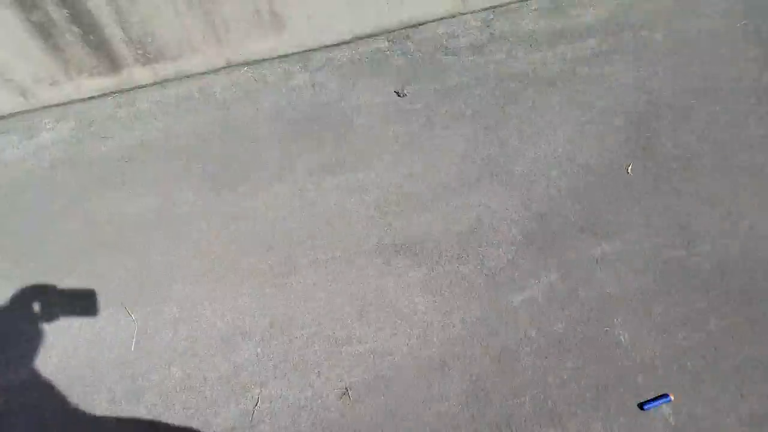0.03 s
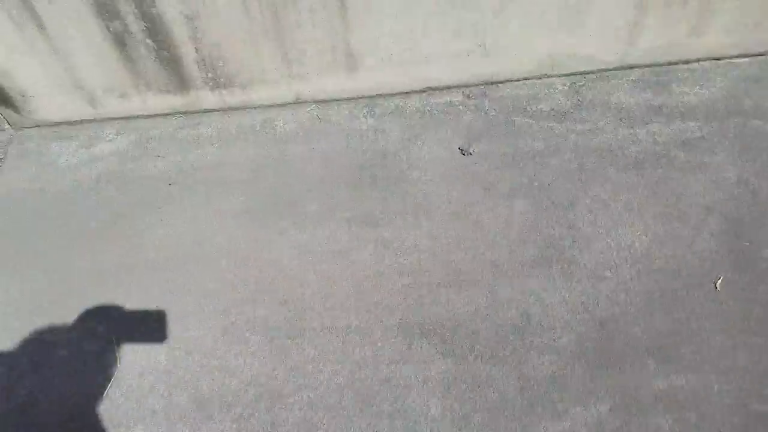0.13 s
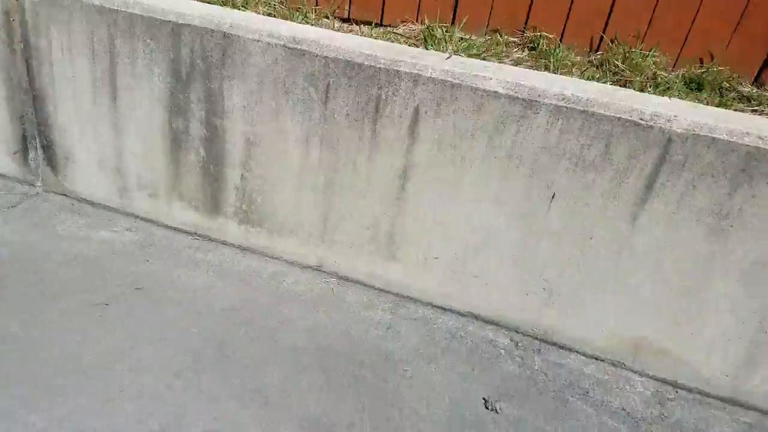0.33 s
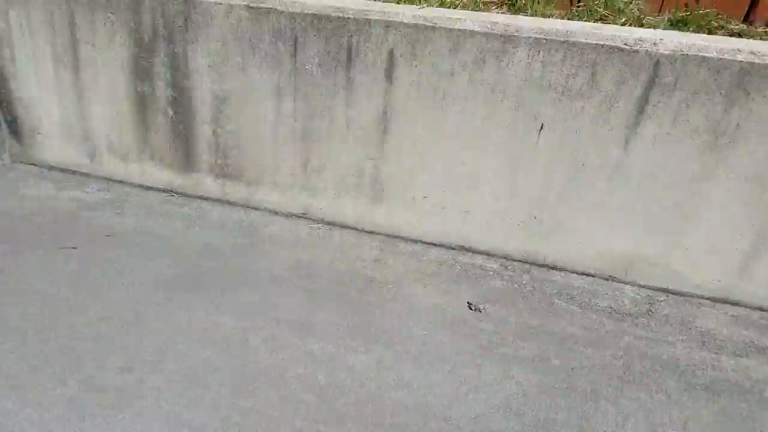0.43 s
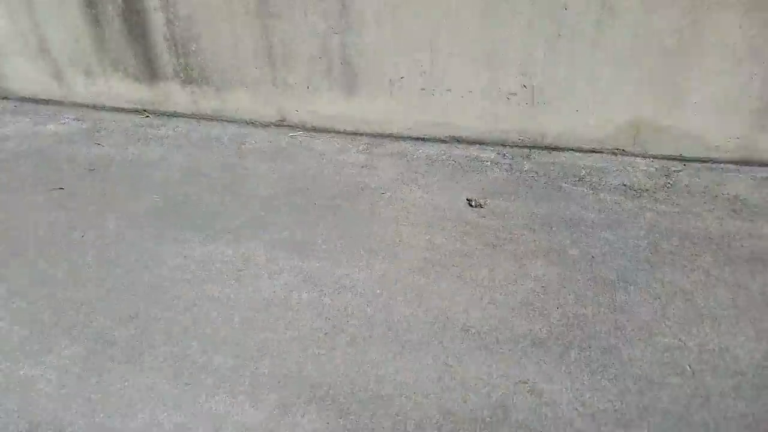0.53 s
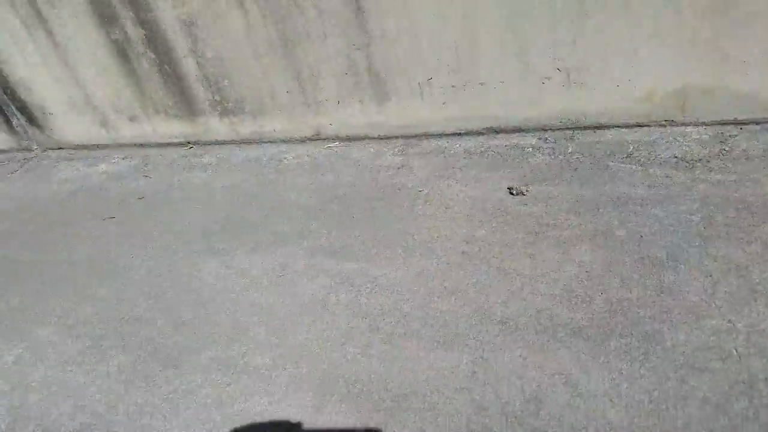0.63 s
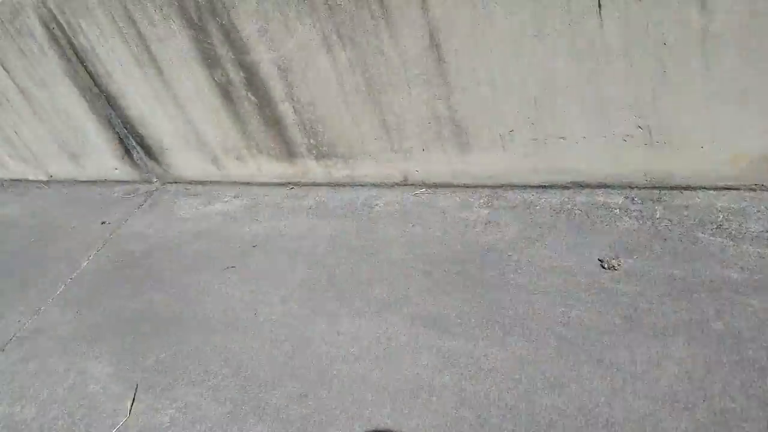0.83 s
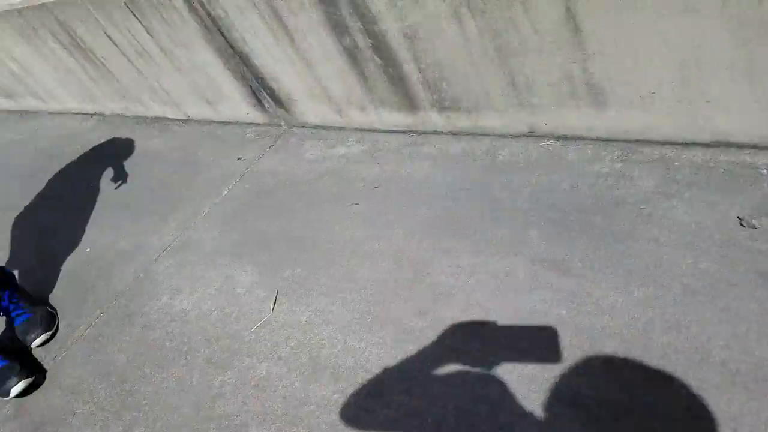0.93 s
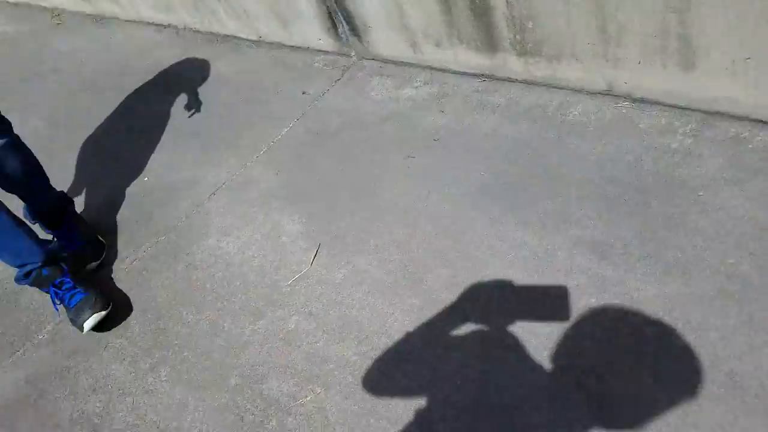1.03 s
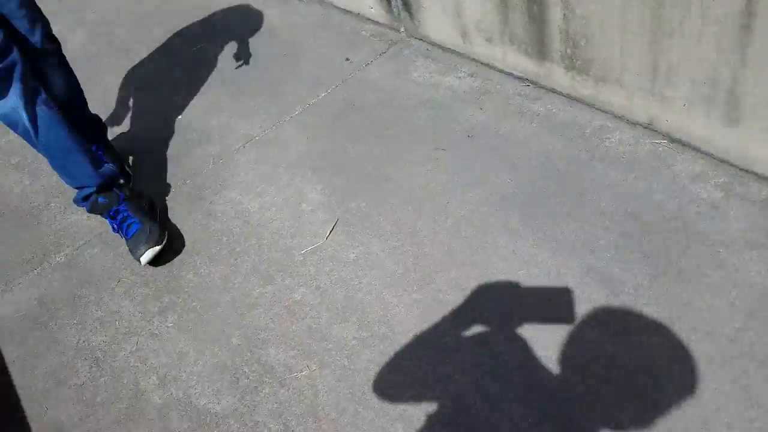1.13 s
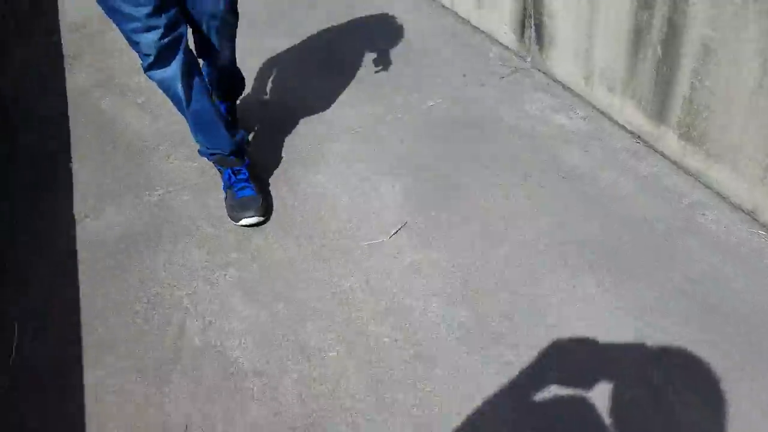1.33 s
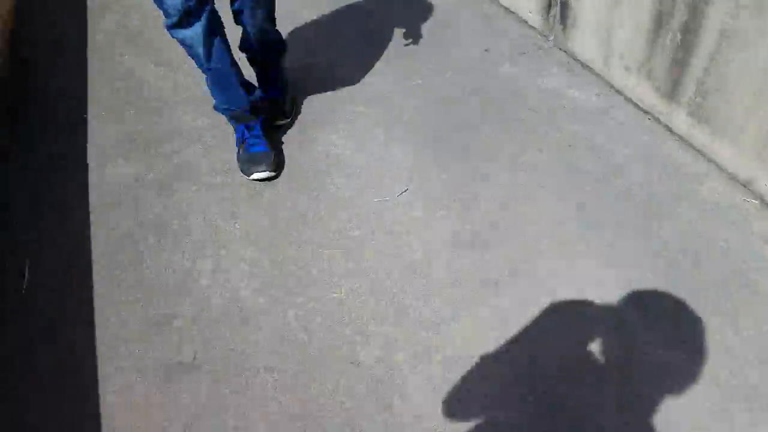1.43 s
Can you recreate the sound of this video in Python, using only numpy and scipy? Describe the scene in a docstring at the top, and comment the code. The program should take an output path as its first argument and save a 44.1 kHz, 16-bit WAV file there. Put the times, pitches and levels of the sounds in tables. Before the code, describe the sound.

In a quiet outdoor yard, a dart slaps onto concrete, rebounding with a dull thud. Tiny taps and handling rubs sound close to the hand-held microphone, a breeze nudges it, and shoes step and scuff softly.

```python
"""A concrete yard beside a low wall. A dart knocks on the ground: a hard slap that rebounds,
a duller thud just after it and a short gritty skid. Faint ticks, shoe scuffs and soft steps
follow. Fingers rustle on a hand-held camera, a breeze nudges its microphone ports, and a
quiet outdoor hush lies under everything."""
import sys
import numpy as np
from scipy import signal
from scipy.fft import rfft, irfft, next_fast_len
from scipy.io import wavfile
from scipy.ndimage import map_coordinates

SR = 44100
rng = np.random.default_rng(int(sys.argv[2]) if len(sys.argv) > 2 else 0)


def generate_wav(sig):
    """Save sig (samples, or channels by samples) to the path in sys.argv[1] as 16-bit PCM at SR."""
    pcm = np.round(np.clip(np.atleast_2d(sig).T, -1, 1) * 32767).astype(np.int16)
    wavfile.write(sys.argv[1], SR, pcm)


N = 66150

# fine friction hiss of grit and fingers: freq_hz, level_db
HISS_SPECTRUM = [(1000, -26), (4000, -7), (7500, -9), (10500, -1.5), (15500, -1.5)]
# left-right likeness of the dart's noise: freq_hz, correlation
DART_LIKENESS = [(500, 0.95), (2500, 0.5), (10000, 0.16)]


def dart():
    """The dart slaps, rebounds, thuds, skids over grit and rings briefly."""
    slap_hits = [(.2443, -7.5), (.2533, -16)]  # start_s, level_db
    slap_modes = [(395, -4.5, 2.6), (630, -1, 3.26), (910, -3, 6.2), (1746, -15, 16), (2800, -2.5, 11.2),
                  (4610, -15, 20)]  # pitch_hz, level_db, life_cycles
    thud_modes = [(401, -2, 6.23), (870, -15, 9.4), (1340, -12.5, 16), (1738, -9, 17.2), (2220, -3, 3.8),
                  (2540, -13.5, 16)]  # pitch_hz, level_db, life_cycles
    slap_ring = [(782, -24, 0.039), (2328, -26, 0.035)]  # pitch_hz, level_db, t60_s
    thud_ring = [(205.4, -34, .11), (254.8, -27.5, 0.13), (355.5, -24.5, 0.12), (396, -26.5, .15),
                 (468, -26.5, 0.13), (519, -32, .14), (810, -29.5, .075), (1200, -36, 0.14),
                 (1612, -30, 0.04), (2117, -32, .08)]  # pitch_hz, level_db, t60_s
    skids = [(.245, -27, 0.0038, 0.0849, -48), (.269, -22, 0.0064, 0.0984, -34.5)]  # start_s, level_db, rise_s, t60_s, grit_db
    skid_spectrum = [(90, -28), (220, -1), (400, 0.5), (620, -3.5), (820, -5), (1100, -4), (1700, -5),
                     (2700, -10.5), (4000, -16.5), (6500, -29), (16000, -32)]  # freq_hz, level_db
    slap_s, thud_s, thud_db = slap_hits[0][0], 0.2678, -6
    slaps = sum(amp(db) * blow(s, slap_modes, cut_hz=260, crack_db=-20, hollow=True)
                for s, db in slap_hits)
    thud = amp(thud_db) * blow(thud_s, thud_modes, cut_hz=99, crack_db=-15)
    skid = 0
    for start_s, level_db, rise_s, t60_s, grit_db in skids:
        slide = amp(level_db) * noise(skid_spectrum, DART_LIKENESS)
        grit = amp(grit_db) * noise(HISS_SPECTRUM, DART_LIKENESS)
        skid += (slide + grit) * swell(start_s, rise_s, t60_s)
    ring = ringing(slap_s, slap_ring) + ringing(thud_s, thud_ring)
    return lag_left(slaps + thud + skid + ring, lag_s=0.00014)


def blow(start_s, modes, cut_hz, crack_db, hollow=False):
    """Short resonances and a noise crack; alternating signs leave hollows between the modes."""
    crack_spectrum = [(500, -20), (1800, -0.5), (2700, 3), (4200, -1), (6500, -17.5), (10000, -9),
                      (16000, -26)]  # freq_hz, level_db
    body = sum((-1) ** (k * hollow) * amp(db) * push(start_s, hz, cycles)
               for k, (hz, db, cycles) in enumerate(modes))
    crack = noise(crack_spectrum, DART_LIKENESS) * swell(start_s, rise_s=0.00038, t60_s=0.017)
    return low_cut(body, cut_hz) + amp(crack_db) * crack


def ringing(start_s, modes, rise_s=0.0096):
    """Modes swell after a blow and die away."""
    t = since(start_s)
    return sum(amp(db) * swell(start_s, rise_s, t60_s) * np.sin(2 * np.pi * (hz * t + rng.random()))
               for hz, db, t60_s in modes)


def feet():
    """Soft soles land with a low push and a little grit, and scuff the concrete."""
    steps = [(0.8627, -43, 467, 2.5, -44.5), (.907, -43, 512, 15, -49), (1.1232, -42, 626, 3.1, -43),
             (1.203, -43.5, 545.2, 3.8, -42), (1.2782, -28, 423, 7.3, -33.5),
             (1.3184, -29.5, 494, 3.6, -42)]  # start_s, body_db, pitch_hz, life_cycles, grit_db
    grit_spectrum = [(80, -23.5), (250, 2), (500, 4.5), (1000, -8.5), (1900, -3), (3200, -20),
                     (7000, -36.5), (14000, -23)]  # freq_hz, level_db
    scuffs = [(.001, -39, 0.029, 0.03), (.9, -54, 0.024, 0.34), (1.121, -45, .004, 0.09),
              (1.238, -46, 0.013, 0.32)]  # start_s, level_db, rise_s, t60_s
    scuff_spectrum = [(150, -20), (600, -9), (730, 5), (860, -8), (1030, 4.5), (1200, -5.5), (2200, -8),
                      (3500, -24), (7000, -35.5), (14000, -25)]  # freq_hz, level_db
    soles = sum(amp(db) * push(s, hz, cycles) for s, db, hz, cycles, _ in steps)
    grit_envelope = sum(amp(db) * swell(s, rise_s=0.0018, t60_s=0.07) for s, *_, db in steps)
    grit = noise(grit_spectrum) * grit_envelope
    scuffing = noise(scuff_spectrum) * swells(scuffs)
    return lag_left(low_cut(soles, hz=130) + grit + scuffing, lag_s=0.00018)


def ticks():
    """Tiny dry taps near the camera, each with a brief fine crackle."""
    taps = [(.475, -26, -49, -0.5), (.48, -31, -55, 2), (0.5175, -34.5, -44.5, 5), (0.5195, -39, -60, 2),
            (.733, -49, -51.5, 3), (0.826, -43.5, -53.5, 0), (0.9482, -51, -45, 1)]  # start_s, peak_db, crackle_db, pan_db
    tap_spectrum = [(300, -38), (1400, -10.5), (2800, -0.5), (5000, -16), (6700, -31), (16000, -22)]  # freq_hz, level_db
    crackle_spectrum = [(4000, -16), (9500, -1), (13500, 0), (15500, -7)]  # freq_hz, level_db
    crackle_noise = noise(crackle_spectrum)
    mix = 0
    for start_s, peak_db, crackle_db, pan_db in taps:
        tap = amp(peak_db) * click(start_s, tap_spectrum)
        crackle = amp(crackle_db) * crackle_noise * swell(start_s, rise_s=0.00027, t60_s=0.012)
        mix += (tap + crackle) * pan(pan_db)
    return mix


def finger_scrape(start_s=0.527, length_s=0.034, scatter_s=0.00121, slips=5, level_db=-38):
    """A finger sticks and slips unevenly; each slip rings the camera's casing."""
    slips_s = start_s + np.linspace(0, length_s, slips) + scatter_s * rng.standard_normal(slips)
    return amp(level_db) * sum(push(s, hz=2110, cycles=15.4) for s in slips_s)


def finger_rubs(grain_db=2.5):
    """Fingers rub the camera: a grainy rasp with a fine hiss."""
    rubs = [(.509, -46.5, -64, .009, .03), (.524, -45, -51.5, 0.0054, 0.32),
            (.532, -43, -44.5, .026, 0.1137), (0.582, -54, -60.5, 0.031, 0.43),
            (.644, -53, -60.5, 0.03, 0.43), (0.74, -52, -52.5, 0.013, 0.24),
            (1.1883, -45.5, -42.5, .002, 0.12), (1.2, -52, -61, 0.0086, 0.52)]  # start_s, rasp_db, hiss_db, rise_s, t60_s
    rasp_spectrum = [(150, -11.5), (500, -0.5), (1400, -4.5), (2050, 1), (3200, -6), (4500, -24.5),
                     (16000, -41)]  # freq_hz, level_db
    rasp = noise(rasp_spectrum) * swells((s, db, rise_s, t60_s) for s, db, _, rise_s, t60_s in rubs)
    hiss = noise(HISS_SPECTRUM) * swells((s, db, rise_s, t60_s) for s, _, db, rise_s, t60_s in rubs)
    grain = unit(amp(grain_db * wobble(rate_hz=400)))
    return (rasp + hiss) * grain * pan(-0.5)


def breeze():
    """Low puffs of air on the ports, stronger on the left."""
    puffs = [(0.139, -48, 0.026, 0.5), (.298, -45.5, 0.084, 0.47), (.404, -42, 0.021, 0.16),
             (.535, -57, 0.024, 0.73), (.738, -54, 0.037, 0.7), (.85, -57, 0.058, .5)]  # start_s, level_db, rise_s, t60_s
    puff_spectrum = [(20, -30), (60, 4.5), (130, 6), (250, -1.5), (450, -3.5), (900, -19), (3000, -35.5)]  # freq_hz, level_db
    return noise(puff_spectrum) * swells(puffs) * pan(3.5)


def yard_echo(x, level_db=-16.5, delay_s=0.012):
    """Wall and fence return a faint diffuse tail."""
    decay_times = [(100, 0.51), (400, 0.54), (1000, 0.3), (2500, 0.54), (14000, 0.79)]  # freq_hz, t60_s
    hz, t, bands = signal.stft(rng.standard_normal((2, SR // 2)), SR, nperseg=256)
    decay = np.exp(-np.log(1000) * t / along(decay_times, hz)[:, None])
    tail = signal.istft(bands * decay, SR)[1]
    tail = np.pad(tail / np.linalg.norm(tail[0]), ((0, 0), (round(delay_s * SR), 0)))
    return amp(level_db) * signal.fftconvolve(x, tail, axes=1)[:, :N]


def hush(waver_db=1.33):
    """Quiet outdoor background; its level drifts and wavers."""
    levels = [(0, -50), (.1, -55.5), (.23, -53.5), (.45, -48), (.62, -57.5), (.84, -56.5), (0.998, -49),
              (1.25, -49.5), (1.5, -51)]  # time_s, level_db
    spectrum = [(25, -30), (48, -15), (161, -10.5), (451, -6.5), (754, -4), (1330, -10.5), (1940, -11.5),
                (2690, -18.5), (6740, -35), (16000, -26)]  # freq_hz, level_db
    likeness = [(60, 0.59), (240, 0.98), (950, 0.051), (3770, -0.16), (15000, 0.16)]  # freq_hz, correlation
    balance = [(80, -3), (400, 0), (950, -2), (2400, -0.8)]  # freq_hz, pan_db
    level_db = np.interp(since(0), *np.transpose(levels)) + waver_db * wobble(rate_hz=14.17)
    return pan_bands(noise(spectrum, likeness), balance) * amp(level_db)


def push(start_s, hz, cycles):
    """Heavily damped swing of peak 1, gone after the given cycles."""
    turns = since(start_s) * hz
    age = turns * 3 * np.pi / cycles
    swing = -np.sin(2 * np.pi * turns) * age * np.exp(-age)
    return swing / abs(swing).max()


def click(start_s, spectrum, size=2048):
    """Minimum-phase click of peak 1."""
    gain = amp(along(spectrum, np.fft.rfftfreq(size, 1 / SR)))
    cepstrum = irfft(np.log(gain))
    cepstrum[1:size // 2] *= 2
    cepstrum[size // 2 + 1:] = 0
    pulse = irfft(np.exp(rfft(cepstrum)))
    return np.pad(pulse / abs(pulse).max(), (round(start_s * SR), N))[:N]


def noise(spectrum, likeness=None):
    """Coloured stereo noise of rms 1 with a given left-right likeness."""
    near_likeness = [(60, 0), (350, 0.75), (2000, 0.03), (12000, 0)]  # default for near sources: freq_hz, correlation

    def mid_side_gain(hz):
        angle = np.arccos(np.clip(along(likeness or near_likeness, hz), -1, 1)) / 2
        return amp(along(spectrum, hz)) * [np.cos(angle), np.sin(angle)]

    mid, side = filtered(rng.standard_normal((2, N)), mid_side_gain)
    return unit(np.array([mid + side, mid - side]))


def swell(start_s, rise_s, t60_s):
    """Smooth rise, exponential fall."""
    rise = np.sin(np.pi / 2 * np.minimum(since(start_s) / rise_s, 1)) ** 2
    return rise * np.exp(-np.log(1000) * since(start_s + rise_s) / t60_s)


def swells(events):
    """Summed envelope of several swells."""
    return sum(amp(db) * swell(s, rise_s, t60_s) for s, db, rise_s, t60_s in events)


def wobble(rate_hz):
    """Smooth random curve, rate_hz knots a second."""
    knots = rng.standard_normal(int(N * rate_hz / SR) + 4)
    return map_coordinates(knots, [np.arange(N) * rate_hz / SR])


def filtered(x, response):
    """Apply a complex frequency response."""
    size = next_fast_len(N + SR // 2)
    return irfft(rfft(x, size) * response(np.fft.rfftfreq(size, 1 / SR)), size)[..., :N]


def low_cut(x, hz):
    """Second-order high-pass."""
    return signal.sosfilt(signal.butter(2, hz, "high", fs=SR, output="sos"), x)


def lag_left(x, lag_s):
    """Sound reaches the left port lag_s after the right."""
    return filtered(x, lambda hz: np.exp(-1j * np.pi * hz * lag_s * np.array([[1], [-1]])))


def pan(pan_db):
    """Stereo gains: left up, right down by pan_db."""
    return amp(pan_db * np.array([[1], [-1]]))


def pan_bands(x, balance):
    """Pan by frequency."""
    return filtered(x, lambda hz: pan(along(balance, hz)))


def along(points, hz):
    """Interpolate (freq_hz, value) points on a log axis."""
    freq_hz, values = np.transpose(points)
    return np.interp(np.log(hz + 1), np.log(freq_hz + 1), values)


def since(start_s):
    """Seconds since start_s, zero before."""
    return np.maximum(np.arange(N) / SR - start_s, 0)


def amp(db):
    """Decibels to gain."""
    return 10 ** (np.asarray(db) / 20)


def unit(x):
    """Scale to rms 1."""
    return x / np.sqrt(np.mean(x ** 2) + 1e-20)


def scene():
    """Dart and feet echo in the yard; the rest is at the camera or all around."""
    ground = dart() + feet()
    return ground + yard_echo(ground) + ticks() + finger_scrape() + finger_rubs() + breeze() + hush()


def record(dry):
    """The two ports differ slightly in colour; nothing passes above top_hz."""
    port_balance = [(100, 0), (300, -0.26), (750, -0.5), (2100, 3.5), (5000, 0), (9000, 1.4), (15000, 1.6)]  # freq_hz, pan_db
    top_hz = 15750
    return filtered(pan_bands(dry, port_balance), lambda hz: hz < top_hz)


dry = scene()
out = record(dry)
generate_wav(out)
```